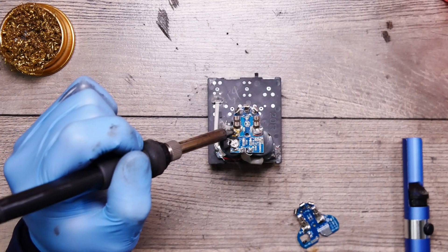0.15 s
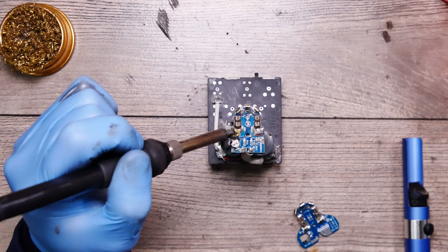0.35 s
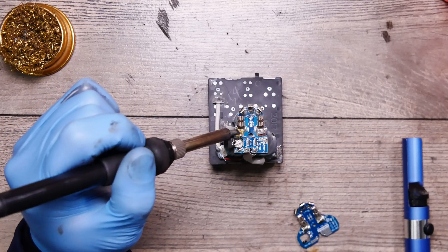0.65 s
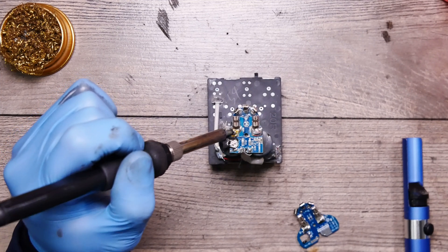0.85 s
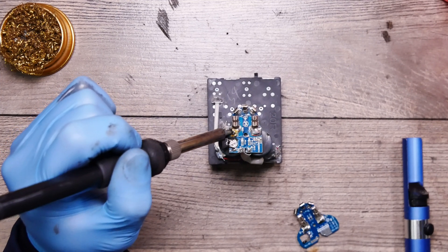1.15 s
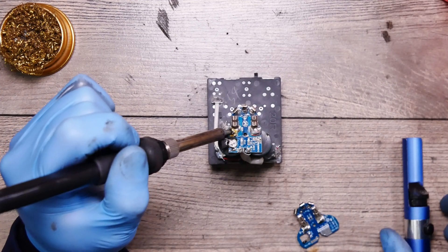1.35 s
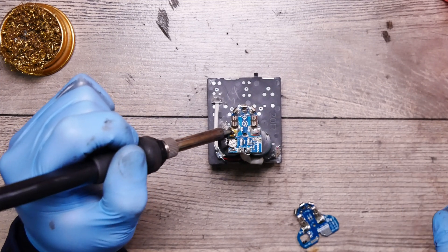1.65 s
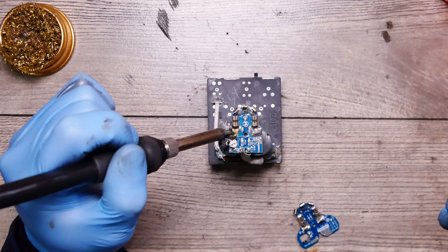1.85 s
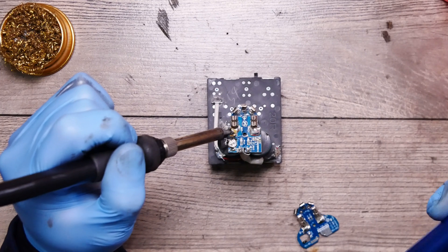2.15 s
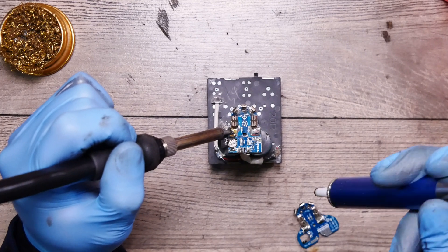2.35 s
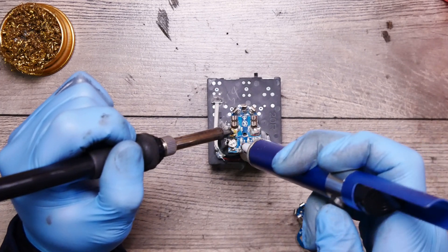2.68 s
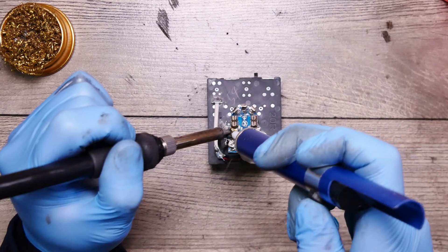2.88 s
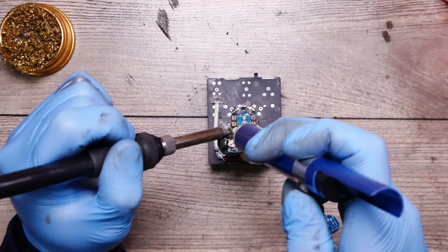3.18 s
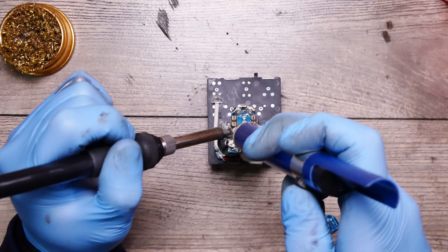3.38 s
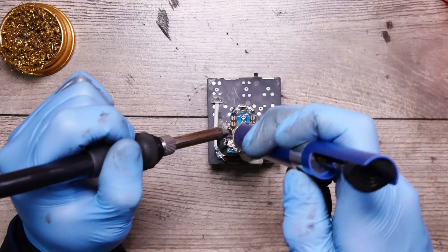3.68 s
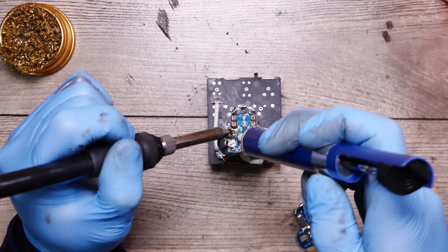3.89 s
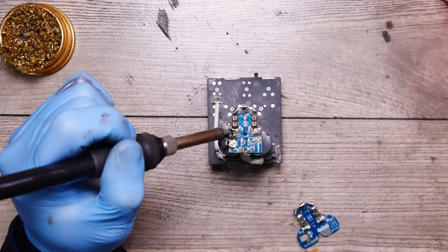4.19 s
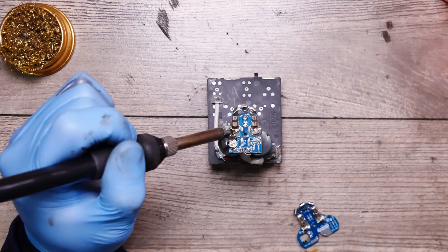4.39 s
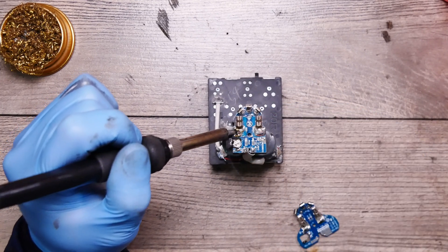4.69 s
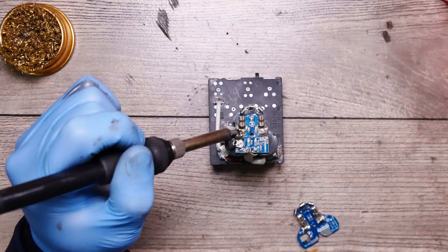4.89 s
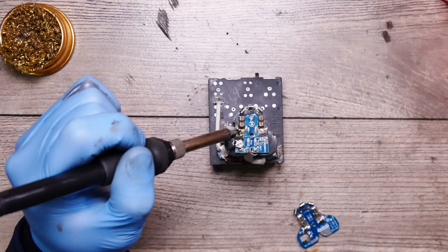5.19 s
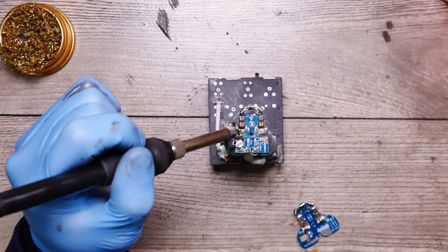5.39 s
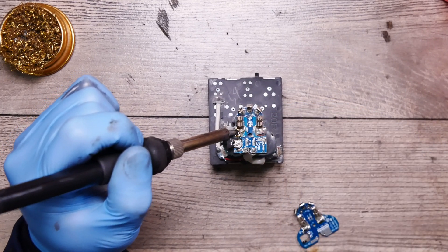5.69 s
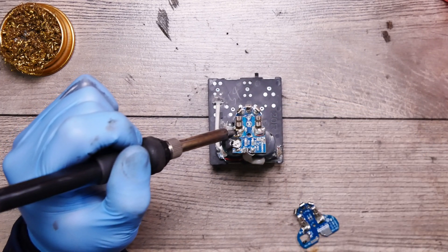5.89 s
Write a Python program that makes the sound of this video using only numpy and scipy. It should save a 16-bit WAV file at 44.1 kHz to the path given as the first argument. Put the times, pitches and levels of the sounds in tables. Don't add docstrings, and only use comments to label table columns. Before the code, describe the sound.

A steady, dull room hush underlies soft rubbing of gloves. Something light and tubular is dragged off wood with a short, gritty rumble and jolt. After a near-silent pause comes one sudden metal snap, faintly springy, with a bench thump. Then a rapid string of clicks, taps and short seal rubs as the pump is recocked, ending in a loud latch. Close stereo microphone, light room reverberation.

```python
import sys
import numpy as np
from scipy import signal
from scipy.fft import irfft
from scipy.io import wavfile
from scipy.ndimage import uniform_filter1d

SR = 44100
rng = np.random.default_rng(int(sys.argv[2]) if len(sys.argv) > 2 else 0)


def file_out(sig):
    cols = np.atleast_2d(sig).T
    lim = np.clip(cols, -1, 1)
    pcm = np.round(lim * 32767).astype(np.int16)
    wavfile.write(sys.argv[1], SR, pcm)


def to_linear_factor(level_db):
    exponent = np.asarray(level_db, float) / 20
    return 10 ** exponent


N = 266364

# t/s, peak level/dB, f of the struck part/Hz, rattle t60/s, barrel share/dB
LATCHES = [
    (3.747, -13, 3270, 0.031, 4),
    (4.328, -23, 3920, 0.026, -4),
    (5.54, -16, 4950, 0.048, 3),
    (5.664, -31, 3840, 0.082, 3),
    (5.775, -37, 2610, 0.024, 3),
    (5.917, -11, 3600, 0.037, 3.5),
    (1.27, -43.5, 2720, 0.023, 7),
    (4.678, -37, 3730, 0.03, 5),
]
TAPS = [(2.119, -34, 3250, 0.03, -10), (3.762, -21.5, 3230, 0.05, 9), (4.59, -43.5, 3720, 0.022, -17),
        (4.897, -27.5, 4770, 0.059, 11), (5.083, -32, 3840, 0.05, -2), (5.174, -17, 3545, 0.058, -15),
        (5.259, -40, 3240, 0.03, -5), (5.308, -24.5, 3680, 0.024, -16), (5.555, -27, 4300, 0.04, -5),
        (5.851, -34, 3620, 0.044, 13), (4.922, -31, 3030, 0.06, -13), (4.94, -9, 3670, 0.058, 12)]
# f/Hz, width/Hz, level/dB
BARREL_MODES = [(1580, 420, -3.5), (3060, 1060, 9), (3584, 470, 7), (4300, 1170, 14.5), (5220, 640, 0),
                (5700, 1200, 0.5), (7200, 900, 1)]
# f/Hz, width/Hz, level/dB
TOP_MODES = [(6900, 570, -19), (9500, 230, -6.5), (10190, 710, -4), (11850, 1400, -11)]
# peak t/s, rise/s, fall/s, level/dB, hiss level/dB
SLIDES = [
    (4.87, 0.083, 0.1, -45.5, 1),
    (4.933, 0.12, 0.0053, -40, 3),
    (5.08, .006, 0.069, -50.5, -5),
    (3.745, .04, 0.0026, -59, -12),
    (5.314, 0.016, 0.038, -33, 0),
    (5.54, 0.0069, 0.044, -39, 2),
    (5.554, 0.022, 0.019, -36.5, 16),
    (5.833, .005, 0.11, -42, -2),
    (5.865, .05, 0.12, -41.5, 5),
    (5.911, 0.0089, 0.0046, -50, -5),
]
# f/Hz, width/Hz, level/dB
SEAL_MODES = [(9400, 7000, 26), (11400, 680, -4)]
# t/s, peak level/dB, centre f/Hz, rattle t60/s, crack level/dB
KNOCKS = [(1.074, -49.5, 980, 0.13, -34), (1.095, -45, 1340, 0.04, -29), (1.1496, -54, 956, 0.13, -9),
          (1.27, -40, 960, 0.041, -14), (1.3174, -47, 950, 0.015, -32), (1.3644, -54, 910, 0.037, -22),
          (1.6166, -21.5, 1310, 0.11, -25), (1.6503, -17, 2870, 0.058, -42), (2.4763, -63, 1160, 0.04, -10),
          (2.61, -57, 902, 0.044, -7), (3.8106, -48, 1770, 0.052, 10), (4.6753, -45, 973, 0.022, 6),
          (4.739, -27, 1252, 0.067, -30), (4.8339, -56, 1070, 0.061, 12), (5.0996, -43, 2700, 0.03, 2.2),
          (5.3159, -34.5, 3190, 0.023, 5.5), (5.4573, -44.5, 2650, 0.03, -2.5),
          (5.5214, -41, 2490, 0.088, -22), (5.5368, -31, 2860, 0.039, -0.6),
          (5.5544, -25, 2950, 0.028, -6.5)]
# t/s, peak level/dB,
# centre f/Hz, width/Hz, rattle t60/s
ROLLS = [(1.664, -35, 2980, 850, 0.5), (.964, -34.5, 284, 180, 0.07), (2.9, -40.5, 260, 150, 0.16),
         (3.245, -42, 270, 140, 0.14), (4.95, -36.5, 4500, 3600, .25), (3.768, -34, 3700, 2100, 0.17),
         (5.664, -30, 3110, 420, 0.15), (1.495, -40, 3600, 1900, 0.28), (6.4, -18, 12000, 1000, .04),
         (5.917, -31, 10500, 2000, .04), (5.175, -31, 3900, 230, .03), (3.762, -49.5, 6570, 200, 0.37),
         (3.763, -45, 10100, 330, 0.26), (4.419, -42.5, 5600, 4100, 0.12), (5.19, -36.5, 3600, 350, 0.45),
         (5.555, -41, 6740, 350, 0.7), (5.558, -40.5, 10200, 310, 0.49), (5.93, -48, 5200, 300, 0.63)]
# start t/s, f/Hz, level/dB, t60/s
SPRING_LINES = [
    (1.9, 3330, -3, .9),
    (3.8, 1690, 1, .5),
    (3.77, 6480, -4, .6),
    (3.77, 5200, -7, .5),
    (5.92, 5040, -2, .6),
    (3.835, 1314, -2, .9),
    (3.806, 770, 7, .12),
    (3.87, 780, -8, .5),
]
# peak t/s, rise/s, fall/s, rumble level/dB, grit level re rumble/dB
DRAGS = [
    (1.445, 0.019, 0.071, -49, -34),
    (1.497, .015, 0.04, -35.5, -19),
    (1.528, .07, 0.088, -26.5, -4.5),
    (1.62, .01, 0.092, -32, -3.5),
    (1.652, 0.0049, 0.035, -16.5, -14.5),
    (1.705, .09, 0.098, -29.5, -16),
    (1.765, 0.034, 0.047, -45.5, -3),
    (1.048, 0.038, 0.12, -52, -6.5),
]
# peak t/s, rise/s, fall/s, rumble level/dB, boom level re rumble/dB
BUMPS = [(.99, .03, 0.075, -54, 2), (2.3, .2, 0.27, -78.5, 15.5), (3.176, 0.00795, 0.054, -61, 14),
         (1.72, .05, 0.065, -38.5, 5), (2.66, 0.094, 0.12, -54.5, -5), (3.197, 0.01505, 0.042, -63, 15.5),
         (3.257, .04, 0.032, -63.5, 15), (3.75, 0.0058, 0.044, -35, 6), (3.814, .01, 0.078, -50, 3),
         (3.87, .08, 0.12, -67.5, 15.5), (3.982, 0.043, 0.032, -68, 11)]
# f/Hz, width/Hz, level/dB
BENCH_MODES = [(285, 45, -9), (380.7, 25.4, 3.5), (471.5, 26, 2), (524.3, 18, -15.5), (613, 20, -5),
               (624, 16, -4), (755, 210, -16)]
# f/Hz, width/Hz, level/dB
BOOM_MODES = [(113.4, 27, -12), (154, 25, -4.5), (194.3, 53, 2), (256, 95, 1.5)]
# f/Hz, width/Hz, level/dB
GRIT_MODES = [(994, 140, 21.5), (1306, 250, 22.5), (1910, 440, 17.5), (2960, 190, 13.5), (4040, 880, -43),
              (9500, 4000, -22)]
# t/s, rustle level/dB
HANDS = [(0.8, -74.5), (1.0, -66.5), (1.14, -64.5), (1.54, -66.5), (1.66, -63.5), (1.91, -58.5),
         (2.24, -61), (3.51, -68.5), (4.17, -68.5), (4.32, -57.5), (4.51, -60), (4.7, -56.5), (5.08, -61.5),
         (5.18, -62), (5.31, -59.5), (5.6, -61.5), (5.75, -61.5), (6.04, -50.5)]
# peak t/s, swell/s, level/dB
RUBS = [(1.15, 0.017, -64), (1.25, 0.024, -71), (1.325, 0.011, -60), (1.846, 0.095, -55.5),
        (1.999, 0.034, -56.5), (2.14, 0.033, -59), (2.286, 0.015, -65), (2.47, .04, -72),
        (2.608, 0.015, -64), (4.16, 0.071, -59.5), (4.42, 0.049, -67), (4.705, 0.03, -64),
        (5.02, 0.054, -64), (5.724, 0.027, -56), (5.97, 0.068, -60)]
# f/Hz, level/dB
CLOTH_SPECTRUM = [(500, -28), (1000, -6), (1900, -1), (3300, -2), (5000, -7), (7500, -17.5), (10000, -15.5),
                  (13500, -25.5)]
# f/Hz, level/dB
HUSH_SPECTRUM = [(20, -27), (60, -8), (110, -14), (200, -3), (300, -6), (400, -0.5), (520, -5.5),
                 (900, -8.5), (2000, -17), (4000, -30.5), (7000, -44), (10000, -65), (13000, -46)]
# f/Hz, correlation/1
LIKENESS = [(60, 0.3), (180, -0.39), (530, -0.11), (1580, -0.26), (4700, 0.56), (14000, 0.28)]
# f/Hz, level/dB
LEFT_LEAN = [(60, 0.64), (230, -1.8), (920, -1.2), (3580, -0.31), (14000, 0.23)]
# f/Hz, t60/s
ROOM_DECAY = [(150, 0.43), (1000, 0.41), (3500, 0.46), (7000, 0.51), (11000, 0.38), (12500, 0.21)]
# f/Hz, level/dB
MIC_RESPONSE = [(30, -10), (80, 2.5), (7000, -1.5), (7900, -8), (8800, -1.5), (11300, -4.5), (12500, -17),
                (14300, -15), (15200, -80)]


def tick(s, db, hz, t60, barrel_db, sheen_db):
    rattle = blow(db, t60)
    part = evened(body(rattle, [(hz, 0.096 * hz, 0)]))
    part = part + to_linear_factor(barrel_db) * evened(body(rattle, BARREL_MODES))
    sheen = body(rattle, TOP_MODES)
    return s, to_linear_factor(db) * (peaked(part) + to_linear_factor(sheen_db) * peaked(sheen))


def slide(peak_s, rise, fall, db, hiss_db):
    s, gain = stroke(peak_s, rise, fall, db)
    slips = grains(SR // 2, per_s=6000, spread_db=2.7)[:len(gain)]
    clumps = evened(uniform_filter1d(slips[::-1], size=200))
    slips = slips * to_linear_factor(1.8 * clumps)
    hiss = evened(body(slips, SEAL_MODES))
    return s, gain * (evened(body(slips, BARREL_MODES)) + to_linear_factor(hiss_db - 7.0) * hiss)


def knock(s, db, hz, width, t60, crack_db):
    rattle = blow(db + 8, t60)
    crack = body(rattle, [(660, 990, 15.0), (4500, 1300, -39), (9000, 1300, -9)])
    dull = signal.lfilter(*signal.butter(2, min(hz + 2 * width, 15000), fs=SR), rattle)
    thud = body(dull, [(hz, max(width, 200), 0)])
    return s, to_linear_factor(db) * (peaked(thud) + to_linear_factor(crack_db) * peaked(crack))


def spring(s, hz, db, t60):
    t = np.arange(8500) / SR
    swell = np.minimum(t / .012, 1) * np.minimum((t[-1] - t) / .04, 1)
    return s, to_linear_factor(-53.5 + db - 60 * t / t60) * np.sin(2 * np.pi * hz * t) * swell


def drag(peak_s, rise, fall, db, boom_db, grit_db):
    s, gain = stroke(peak_s, rise, fall, db)
    slips = grains(SR // 2, per_s=3500, spread_db=2.5)[:len(gain)]
    shake = evened(body(slips, BENCH_MODES)) + to_linear_factor(boom_db) * evened(body(slips, BOOM_MODES))
    soft = signal.lfilter(*signal.butter(2, 1000, fs=SR), shake)
    return s, gain * (soft + to_linear_factor(grit_db) * evened(body(slips, GRIT_MODES)))


def rustle():
    gain = to_linear_factor(np.interp(np.arange(N) / SR, *np.transpose(HANDS)))
    for s, swell, db in RUBS:
        add(gain, *stroke(s, 2 * swell, 2 * swell, db))
    return gain * air(CLOTH_SPECTRUM, patchy_db=.6, near=.4)


def near_echoes(x):
    taps = np.zeros((2, 160))
    at = rng.integers(4, 160, (2, 6))
    np.put_along_axis(taps, at, rng.choice([-1., 1.], (2, 6)) / np.sqrt(6), 1)
    return signal.oaconvolve(x[None], taps, axes=1)[:, :N]


def room(x):
    taps = np.zeros((2, SR // 2))
    at = np.arange(200, SR // 2 - 20, 20) + rng.integers(0, 20, (2, (SR // 2 - 201) // 20))
    np.put_along_axis(taps, at, rng.choice([-1., 1.], at.shape), 1)
    taps = taps + 0.54 * taps[::-1]
    hz, t, z = signal.stft(taps, SR, nperseg=256)
    decay = to_linear_factor(-60 * t / read(ROOM_DECAY, hz)[:, None])
    tail = signal.istft(z * decay, SR, nperseg=256)[1]
    return signal.fftconvolve(x[None], tail / np.linalg.norm(tail[0]), axes=1)[:, :N]


def hush():
    return to_linear_factor(-56) * air(HUSH_SPECTRUM, patchy_db=.6, near=0)


def air(colour, patchy_db, near):
    frames, hz = N // 256 + 5, np.fft.rfftfreq(1024, 1 / SR)
    a, b, c, d, patches = rng.standard_normal((frames, 513, 5)).T
    patches = uniform_filter1d(patches, size=10, axis=0)
    patches = evened(uniform_filter1d(patches, size=10, axis=1))
    same = np.clip(read(LIKENESS, hz) + near, -1, 1)[:, None]
    lean = read(LEFT_LEAN, hz)[:, None] / 2
    left = a + 1j * b
    right = same * left + np.sqrt(1 - same ** 2) * (c + 1j * d)
    z = np.array([left * to_linear_factor(lean), right / to_linear_factor(lean)])
    z = z * to_linear_factor(read(colour, hz)[:, None] + patchy_db * patches)
    return evened(signal.istft(z, nperseg=1024, noverlap=768)[1][:, :N])


def blow(db, t60):
    t = np.arange(7000) / SR
    rise = np.clip(.00005 * to_linear_factor(-db), .0002, .004)
    rattle = rng.standard_normal(len(t)) * to_linear_factor(-60 * t / max(t60, .004)) * np.minimum(t / rise, 1)
    contact = np.exp(-((t - .0006) / .00004) ** 2)
    return rattle + 3.5 * contact * (.0004 / rise)


def grains(size, per_s, spread_db):
    slips = to_linear_factor(spread_db * np.minimum(rng.exponential(1, size), 4))
    slips = slips * (rng.random(size) < per_s / SR)
    return evened(slips * rng.standard_normal(size) + 0.083 * rng.standard_normal(size))


def stroke(peak_s, rise, fall, db):
    rise, fall = max(rise, .003), max(fall, .003)
    t = np.arange(-rise, fall, 1 / SR)
    ends = np.clip(np.minimum(t + rise, fall - t) / .004, 0, 1)
    return peak_s - rise, ends * to_linear_factor(db - 30.5 * np.maximum(-t / rise, t / fall))


def resonate(x, hz, width):
    r = np.exp(-np.pi * abs(width) / SR)
    return 2 * signal.lfilter([1 - r], [1, -r * np.exp(2j * np.pi * hz / SR)], x).real


def body(x, modes):
    return sum(to_linear_factor(db) / np.sqrt(w) * resonate(resonate(x, hz, w), hz, 3 * w) for hz, w, db in modes)


def above(x, hz):
    return signal.lfilter(*signal.butter(2, hz, "high", fs=SR), x)


def evened(x):
    return x / np.sqrt(np.mean(x ** 2) + 1e-20)


def peaked(x):
    return x / abs(x).max()


def read(points, hz):
    f, value = np.transpose(points)
    return np.interp(np.log(hz + 1), np.log(f + 1), value)


def add(mix, s, sound):
    part = mix[round(s * SR):][:len(sound)]
    part += sound[:len(part)]


def scene():
    pump, coil, wood = np.zeros((3, N))
    for row in LATCHES:
        add(pump, *tick(*row, sheen_db=-10.5))
    for row in TAPS:
        add(pump, *tick(*row, sheen_db=-20.5))
    for row in SLIDES:
        add(pump, *slide(*row))
    for s, db, hz, t60, crack_db in KNOCKS:
        add(pump, *knock(s, db, hz, 690, t60, crack_db))
    for row in ROLLS:
        add(pump, *knock(*row, crack_db=-35))
    for row in SPRING_LINES:
        add(coil, *spring(*row))
    for *shape, grit_db in DRAGS:
        add(wood, *drag(*shape, boom_db=-14, grit_db=grit_db))
    for row in BUMPS:
        add(wood, *drag(*row, grit_db=-11.5))
    pump, wood = above(pump, hz=256), above(wood, hz=72)
    direct = coil + wood * to_linear_factor([[-2.5], [.5]]) + pump * to_linear_factor([[-.6], [.6]])
    early = near_echoes(above(to_linear_factor(-7.0) * wood + to_linear_factor(-8) * pump, hz=570))
    late = room(to_linear_factor(-8.0) * wood + to_linear_factor(-11.5) * pump)
    return direct + early + late + rustle() + hush()


def top_cut(x):
    return signal.sosfilt(signal.butter(12, 14580, fs=SR, output="sos"), x)


def record(dry):
    gain = to_linear_factor(read(MIC_RESPONSE, np.fft.rfftfreq(1024, 1 / SR)))
    taps = np.roll(irfft(gain), 512) * np.hanning(1024)
    mix = signal.oaconvolve(dry, taps[None], "same", axes=1)
    return top_cut(mix)


dry = scene()
out = record(dry)
file_out(out)
```